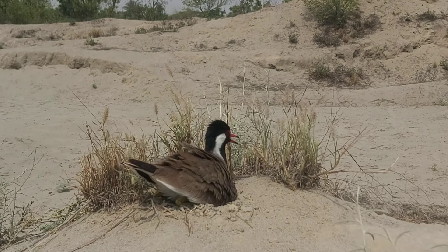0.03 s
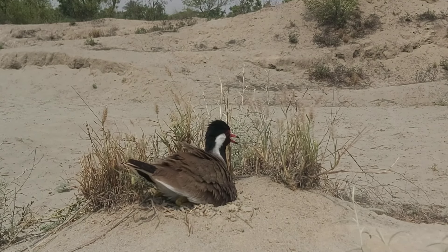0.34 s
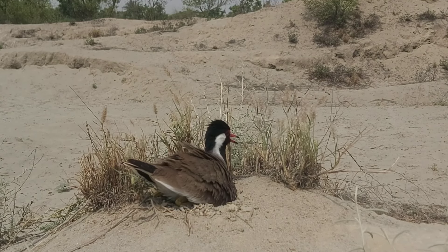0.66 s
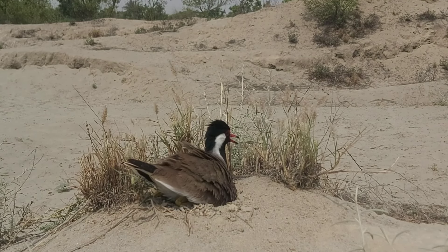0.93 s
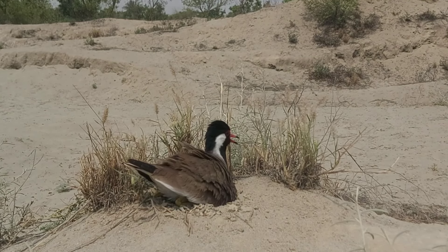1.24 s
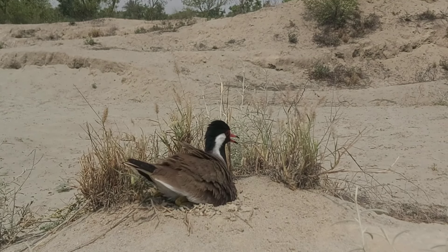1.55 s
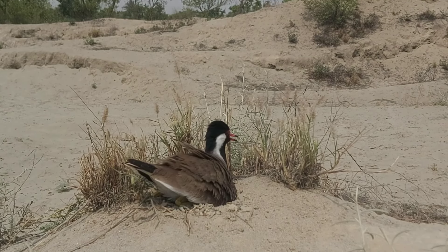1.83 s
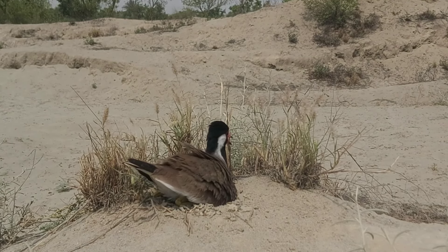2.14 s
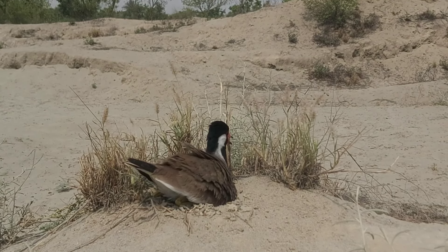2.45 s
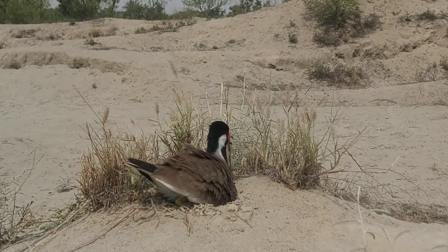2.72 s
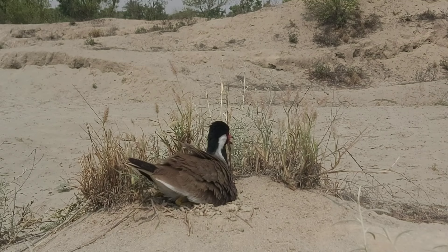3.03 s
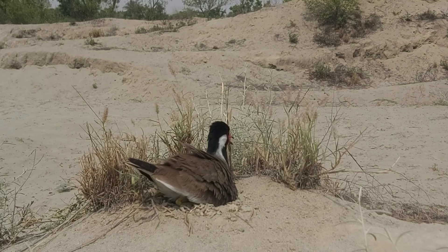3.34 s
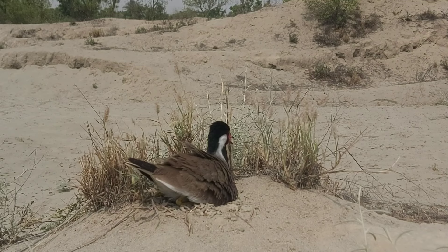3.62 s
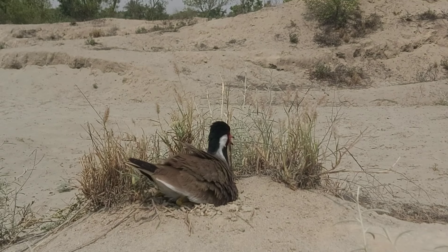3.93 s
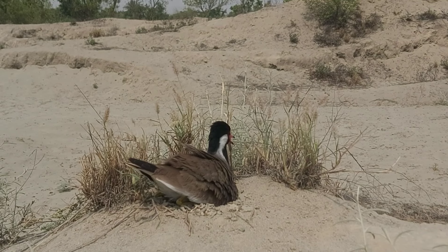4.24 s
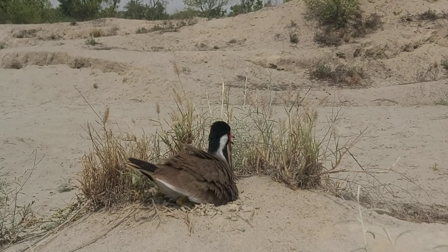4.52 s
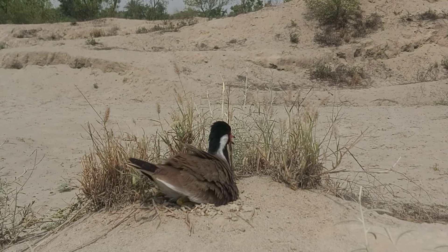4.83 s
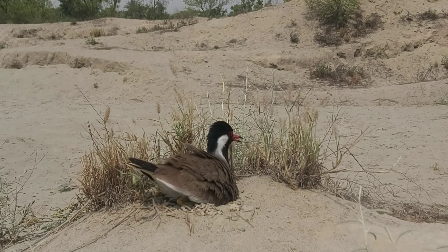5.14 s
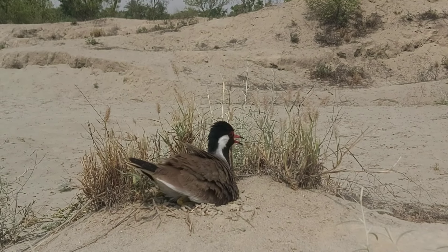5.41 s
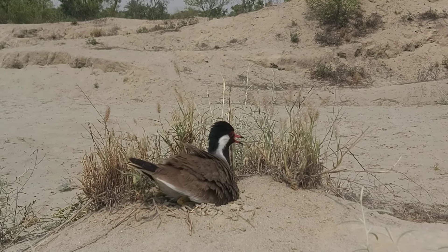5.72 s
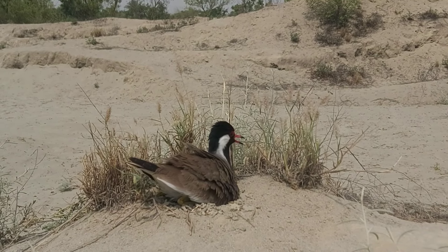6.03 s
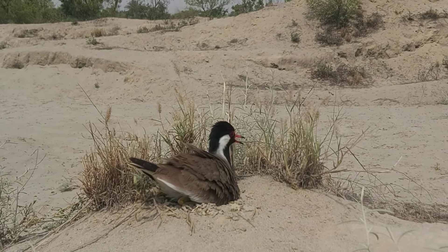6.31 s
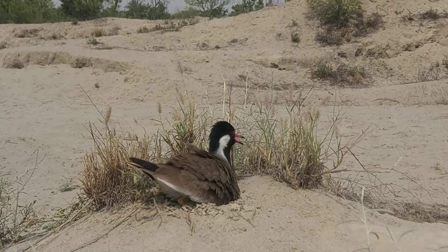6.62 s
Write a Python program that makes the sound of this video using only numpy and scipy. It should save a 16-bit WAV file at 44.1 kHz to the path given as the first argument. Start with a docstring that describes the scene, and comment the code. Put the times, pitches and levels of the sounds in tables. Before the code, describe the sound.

Outdoors on open sandy ground, low wind buffeting comes and goes on the microphone and is the loudest sound. Beneath it a distant engine chugs with a light knocking rattle, growing weaker after about three seconds. Short, reedy bird calls come from the left near the beginning and again at the end, with faint far-off chirps and a slight hiss of dry grass.

```python
"""Gusts of wind buffet a stereo microphone in open sandy scrub, their turbulent pressure a low rumble.
Far to the right a slow single-cylinder engine thuds from its exhaust and clatters from its casing,
swelling and fading on the wind. On the left a hoarse game bird calls in phrases of up to three notes,
a reedy harmonic voice. Small birds whistle and chirp further off, and dry grass stirs in the breeze."""
import sys
import numpy as np
from scipy import signal
from scipy.fft import rfft, irfft, next_fast_len
from scipy.io import wavfile
from scipy.ndimage import uniform_filter1d

SR = 44100
rng = np.random.default_rng(int(sys.argv[2]) if len(sys.argv) > 2 else 0)


def generate_wav(signal):
    """Clip the signal to [-1, 1] and save it as 16-bit WAV at the path in sys.argv[1]."""
    frames = np.transpose(np.atleast_2d(signal))
    scaled = np.clip(frames, -1, 1) * 32767
    pcm = np.round(scaled).astype(np.int16)
    wavfile.write(sys.argv[1], SR, pcm)


N = 294147
TIME = np.arange(N) / SR
ENGINE_LAG, BIRD_LAG = 19, -21  # samples by which the left ear lags

# Levels in the tables are relative; a positive pan is to the left.
# Spectra of the background: (frequency [Hz], level [dB])
AIR_SPECTRUM = [(100, 13.5), (400, -7.5), (700, -2.5), (1200, -2.5), (2300, -2.5), (3200, -9.5),
                (4300, -13), (5500, -19.5), (8000, -24.5), (16000, -51.5)]
GRASS_SPECTRUM = [(2000, -23), (3800, 12), (5500, 5), (7600, 11), (8300, 2), (12000, -15), (16000, -34.5)]
HISS_SPECTRUM = [(1000, -36), (6000, -35), (8500, -6.5), (10000, -2), (12300, 4), (15500, -2.5)]
# Falling slurs of small birds: (time [s], level [dB], starting pitch [Hz])
BIRD_SLURS = [(.628, -70.5, 3620), (.745, -60, 2584), (0.813, -71, 3670), (3.665, -74.5, 3700),
              (3.87, -80, 3700), (4.35, -68.5, 2270), (5.605, -74.5, 3570), (5.79, -67.5, 3810)]
# Their whistles: (time [s], duration [s], level [dB], pitch [Hz], final fall [share of pitch])
BIRD_WHISTLES = [(0.83, 0.16, -61.5, 2050, 0.085), (1.53, .1, -66, 2520, -0.034),
                 (1.787, 0.082, -67, 2420, .02), (1.987, 0.074, -66.5, 2450, 0),
                 (2.215, 0.1, -80, 5480, 0.057), (2.426, .1, -70.5, 4990, .13),
                 (4.256, .09, -77, 2300, 0.037), (6.456, 0.091, -65.5, 2288, 0.013)]
# Their buzzy chirps: (time [s], level [dB], pitch [Hz])
BIRD_BUZZES = [(-.015, -66.5, 3980), (.025, -74, 5700), (.165, -73, 5640), (.31, -72, 5500),
               (0.439, -79, 4050), (.675, -80, 4530), (1.24, -78, 5800), (1.631, -81, 6000),
               (1.42, -80.5, 3980), (1.735, -76, 3900), (2.275, -76, 5180), (3.527, -82, 4250),
               (3.689, -80, 4350), (3.85, -80, 4330), (4.944, -83.5, 4060), (5.987, -70, 2850)]
# Game bird notes: (time [s], duration [s], level [dB], pitch [Hz], rise [share of pitch], roughness [0-1])
GAME_NOTES = [(0.111, 0.064, -53.5, 489, -0.064, 0.2), (.2, 0.13, -53.5, 687, -0.013, 0.32),
              (0.323, 0.1, -52, 558.5, 0.027, 0.13), (0.998, 0.074, -63.5, 498, 0.022, 0),
              (1.229, 0.11, -57.5, 565, 0.03, 0), (6.081, 0.085, -58, 487, 0.116, 0.2),
              (6.185, 0.084, -56.5, 707, 0.041, .45), (6.303, .11, -51, 554.7, .06, 0.09)]
# Partials of its voice: (harmonic [number], level [dB])
GAME_HARMONICS = [(2, -26), (3, 0), (4, -16), (5, -21)]
# Engine timing, about 11 firings a second: (time [s], firings so far [count])
FIRING_COUNT = [(-.081, -1), (3.192, 36), (6.675, 75)]
# How well the breeze carries the engine: (time [s], exhaust level [dB], clatter level [dB])
TRANSMISSION = [(0, -56.5, -66), (.27, -56.5, -65), (.54, -65.5, -74.5), (.8, -58, -67), (1.07, -62, -74),
                (1.33, -63, -67), (2.05, -61, -68.5), (2.66, -67, -67), (3.35, -71.5, -75),
                (3.73, -73.5, -69), (4.2, -76.5, -73), (4.7, -81, -68.5), (5.1, -68.5, -69.5),
                (5.5, -77.5, -74.5), (6.15, -72, -71), (6.67, -75.5, -72.5)]
# Spectra of the engine's parts: (frequency [Hz], level [dB])
EXHAUST_SPECTRUM = [(30, 2), (70, -5.5), (130, -0.5), (200, -9), (300, -2.5), (400, -5), (480, -6.5),
                    (580, -30.5), (800, -29), (1500, -84)]
BOOM_SPECTRUM = [(15, -30.5), (30, -12), (60, 0.5), (100, 1), (150, -6), (210, -15), (295, -12),
                 (400, -31.5), (520, -39), (700, -62), (1500, -93)]
CLATTER_SPECTRUM = [(400, -38.5), (700, -18), (1050, 3.5), (1550, 0), (1950, -9), (2450, -18),
                    (3000, -16.5), (4000, -22), (6000, -48.5), (10000, -69.5)]
CASING_SPECTRUM = [(1500, -24), (2100, -10.5), (2300, -3), (2480, -3), (2750, -7.5), (3100, -18.5),
                   (4500, -57.5)]
# Reflections from banks of sand: (delay [s], level [dB])
BANK_ECHOES = [(0.017, -22), (0.027, -9.5), (0.051, -11.5)]
# Hardest engine knocks: (time [s], peak level [dB], ring frequency [Hz])
HARD_KNOCKS = [(0.627, -52, 2310), (0.716, -51, 2620), (0.8912, -43.5, 2110), (0.9817, -46, 2030),
               (1.0686, -51, 2450), (1.247, -44, 1750), (1.6884, -53, 1600), (1.7782, -48, 2330),
               (2.1301, -53.5, 1846), (2.3088, -49, 1700), (2.4862, -50, 2320), (2.5736, -42.5, 1890),
               (3.017, -51.5, 2260), (3.105, -51, 1810), (3.371, -53, 1480), (3.5498, -52.5, 1560),
               (3.7284, -48.5, 1730), (5.1572, -50, 1480)]
# Gusts at the microphone: (time [s], hold [s], level [dB], pan [dB])
WIND_GUSTS = [(0.031, 0.084, -33.5, 19), (0.197, 0.14, -34.5, 8), (0.722, 0.13, -45, -3),
              (0.886, .12, -51, 15), (1.216, 0.18, -35.5, 11.5), (1.495, 0.17, -38.5, 11),
              (1.78, .11, -35.5, 0), (1.945, 0.17, -35, 1), (2.31, 0.084, -41.5, 12),
              (2.456, 0.036, -34, 6), (2.513, 0.093, -28.5, 0.5), (3.201, 0.012, -44.5, 19),
              (3.368, 0.032, -43.5, 6), (3.55, 0.058, -41, 3), (3.77, 0.084, -45, 6.5),
              (4.328, 0.074, -42.5, 0), (4.44, 0.028, -38.5, 2), (4.58, 0.056, -40, -5),
              (5.028, 0.057, -30.5, 8), (5.115, 0.074, -33, 4), (5.225, 0.243, -43.5, 1),
              (5.591, 0.13, -37.5, -2.5), (5.808, 0.07, -43.5, -1), (5.98, 0.065, -37, 1),
              (6.128, 0.051, -32.5, 5), (6.306, 0.18, -41.5, 21)]
# Strongest eddies: (time [s], peak level [dB], frequency [Hz], pan [dB])
STRONG_EDDIES = [(0.068, -25, 107, 22), (0.753, -37, 80, -1), (0.98, -36, 170, 1), (1.255, -26, 89.2, 9),
                 (1.33, -24.5, 116, -7), (1.56, -26, 112, 12), (1.633, -26, 104, -1),
                 (1.885, -28.5, 109, -16), (1.958, -25, 108, -0.5), (2.006, -15, 117, 2),
                 (2.104, -22.5, 77, 3), (2.525, -22.5, 103, -5), (3.59, -22.5, 97, -2), (4.344, -29, 89, 0),
                 (4.369, -28, 77, -1), (2.601, -26, 101, 2), (5.038, -25.5, 270, 3),
                 (5.073, -22.5, 108, -10), (5.687, -24, 99, 1), (5.878, -36, 181, 0), (6.124, -23, 125, 2),
                 (6.364, -29, 87.5, 15)]
# Spectra of coarse and fine turbulence: (frequency [Hz], level [dB])
BUFFET_SPECTRUM = [(15, -30), (30, -20), (60, 3.5), (100, 1.5), (150, -5), (210, -13.5), (300, -19),
                   (400, -32.5), (520, -36.5), (700, -60.5), (1500, -92.5)]
SWIRL_SPECTRUM = [(80, -23.5), (200, 4.5), (290, -2.5), (380, -15), (520, -27), (750, -41), (1500, -79.5)]


def gain_of(db):
    """Amplitude ratio: a factor of ten for every 20 dB."""
    return 10 ** (np.asarray(db) / 20)


def unit_rms(x):
    """Normalisation to unit mean power."""
    return x / np.sqrt(np.mean(x ** 2) + 1e-20)


def curve(rows, column):
    """Linear interpolation of a table column at every sample."""
    rows = np.array(rows)
    return np.interp(TIME, rows[:, 0], rows[:, column])


def colour(x, spectrum):
    """Minimum-phase filtering to a given spectral shape, at unit rms."""
    hz, db = np.transpose(spectrum)
    bin_hz = abs(np.fft.fftfreq(4096, 1 / SR))
    log_gain = np.log(gain_of(np.interp(np.log(bin_hz + 1), np.log(hz), db)))
    taps = np.fft.ifft(np.exp(np.conj(signal.hilbert(log_gain)))).real
    return unit_rms(signal.oaconvolve(np.atleast_2d(x), taps[None, :len(taps) // 2], axes=1)[:, :N])


def noise():
    """White noise, incoherent between the two microphone ports."""
    return rng.standard_normal((2, N))


def wander(hz, size=N):
    """Random modulation: noise low-passed at hz, at unit rms."""
    padded = next_fast_len(size + 4096)
    rolloff = 1 + (np.fft.rfftfreq(padded, 1 / SR) / hz) ** 4
    return unit_rms(irfft(rfft(rng.standard_normal(padded)) / rolloff, padded))[:size]


def add(mix, start, sound):
    """Superposition of a sound at a time in seconds, which may be negative."""
    at = round(start * SR)
    sound = sound[..., max(-at, 0):]
    part = mix[..., max(at, 0):][..., :sound.shape[-1]]
    part += sound[..., :part.shape[-1]]


def arrive(x, lag):
    """Path difference: a far sound reaches one port before the other."""
    return np.array([np.roll(x, lag), x])


def pan(pan_db):
    """Level difference between left and right at constant total power."""
    pair = gain_of(np.array([[pan_db], [-pan_db]]) / 2)
    return pair / np.sqrt(np.mean(pair ** 2))


def scatter(x, t60, wet_db):
    """Scattering by scrub and uneven ground adds a diffuse, exponentially decaying tail."""
    t = np.arange(SR // 2) / SR
    tail = rng.standard_normal((2, len(t))) * gain_of(-60 * t / t60)
    tail /= np.linalg.norm(tail[0])
    return x + gain_of(wet_db) * signal.oaconvolve(x, tail, axes=1)[:, :N]


def excess_db(strength):
    """Power level of the wind relative to its mean level."""
    db = 10 * np.log10(np.mean(strength ** 2, axis=0))
    return db - db.mean()


def background(strength, air_db=-69, grass_db=-89, hiss_db=-81):
    """Flow noise: distant air, dry grass stirred by breeze and gusts, and a hiss that swells with gusts."""
    carried_db, gust_db = curve(TRANSMISSION, column=1), excess_db(strength)
    stir_db = 0.49 * (carried_db - carried_db.mean()) + 0.27 * gust_db
    flutter = 0.44 * wander(hz=12)
    air = gain_of(air_db + 2.5 * wander(hz=8.4)) * colour(noise(), AIR_SPECTRUM)
    grass = gain_of(grass_db + stir_db + 3.1 * flutter) * colour(noise(), GRASS_SPECTRUM)
    hiss = gain_of(hiss_db + flutter + 0.14 * gust_db) * colour(noise(), HISS_SPECTRUM)
    return air + grass * pan(9) + hiss * pan(-2.4)


def syllable(length, pitches, waver, waver_hz):
    """Frequency modulation: phase and arched envelope of a wavering glide through three pitches."""
    progress = np.linspace(0, 1, max(round(length * SR), 64))
    glide_hz = np.polyval(np.polyfit([0, .5, 1], pitches, 2), progress)
    hz = glide_hz * (1 + waver * wander(waver_hz, len(progress)))
    return 2 * np.pi * np.cumsum(hz) / SR, np.sin(np.pi * progress).clip(0)


def chirp(length, hz, contour, rough):
    """Amplitude modulation: a small bird's gliding tone flickers in the moving air."""
    phase, arch = syllable(length, hz * np.array(contour), waver=0.097 * rough, waver_hz=350)
    flicker = gain_of(3 * wander(150, len(phase)))
    return unit_rms(np.sin(phase) * arch ** 0.5 * flicker)


def small_birds(level_db=-5, pan_db=5):
    """Modulated tones, blurred by scattering in the scrub: slurs, whistles and buzzy chirps."""
    song = np.zeros(N)
    for start, db, hz in BIRD_SLURS:
        add(song, start, gain_of(db) * chirp(0.082, hz, contour=(1, 0.89, 0.74), rough=0.092))
    for start, length, db, hz, fall in BIRD_WHISTLES:
        add(song, start, gain_of(db) * chirp(length, hz, contour=(1, 1, 1 - fall), rough=0.12))
    for start, db, hz in BIRD_BUZZES:
        add(song, start, gain_of(db) * chirp(0.055, hz, contour=(0.973, 1, 1.027), rough=0.7))
    return scatter(gain_of(level_db) * pan(pan_db) * song, t60=0.24, wet_db=-1)


def game_bird(rasp=0.058, rasp_hz=260, flutter=0.0185, throat_hz=2800, flicker_db=2):
    """Source and filter: a reedy voice, strongest in its third harmonic, rasps under fast modulation."""
    calls = np.zeros(N)
    for start, length, db, hz, rise, rough in GAME_NOTES:
        pitches = (hz * (1 - rise / 2), hz, hz * (1 + rise / 2))
        phase, arch = syllable(length, pitches, rasp * rough, rasp_hz)
        phase += 2 * np.pi * np.cumsum(hz * flutter * wander(49, len(phase))) / SR
        voice = sum(gain_of(level) * np.sin(k * phase) for k, level in GAME_HARMONICS)
        voice *= 1 + 1.05 * rough * wander(rasp_hz, len(phase))
        flicker = gain_of(flicker_db * wander(45, len(phase)))
        add(calls, start, gain_of(db) * unit_rms(voice * arch ** 0.66 * flicker))
    throat = signal.butter(6, throat_hz, fs=SR, output="sos")  # little passes above its resonance
    return scatter(arrive(signal.sosfilt(throat, calls), BIRD_LAG), t60=0.22, wet_db=-13.5)


def since_firing():
    """Cycle phase divided by firing rate gives the seconds since the cylinder last fired."""
    cycles = curve(FIRING_COUNT, column=1)
    return cycles % 1 / (np.gradient(cycles) * SR)


def exhaust(level_db=5, puff=0.016, puff_decay_s=0.061, uneven_db=2.2):
    """Pulse excitation: each firing emits a pressure pulse, which the banks reflect, and a puff of gas."""
    age = since_firing()
    fires = np.diff(age, prepend=0) < -age.mean()
    pulses = fires * gain_of(uneven_db * wander(hz=22))
    thud = pulses + puff * np.exp(-age / puff_decay_s) * rng.standard_normal(N)
    for delay, db in BANK_ECHOES:
        add(thud, delay, gain_of(db) * pulses)
    direct = arrive(colour(thud, EXHAUST_SPECTRUM)[0], ENGINE_LAG)
    heard = scatter(direct, t60=0.25, wet_db=-9.5)
    return unit_rms(heard) * gain_of(curve(TRANSMISSION, column=1) + level_db)


def throb(level_db=14, decay_s=0.015, peak_s=0.0087, uneven_db=3):
    """Diffraction: the bass of each firing bends round the banks and arrives as a soft boom."""
    swell = np.exp(-abs(since_firing() - peak_s) / decay_s)
    swell *= gain_of(uneven_db * np.tanh(wander(hz=5)))
    boom = colour(swell * rng.standard_normal(N), BOOM_SPECTRUM)[0]
    carried_db = 0.4 * curve(TRANSMISSION, column=1) + 0.6 * curve(TRANSMISSION, column=2)
    return arrive(boom, ENGINE_LAG) * gain_of(carried_db + level_db)


def clatter(level_db=3, ring_db=-9, decay_s=0.011, uneven_db=2.2, steady_rattle=0.25):
    """Impact noise: combustion knock, then valve slap; the casing rings through when the exhaust is loud."""
    age = since_firing()
    knock, slap = ((age > at) * np.exp(-abs(age - at) / decay_s) for at in (0.0028, 0.016))
    blows = (knock + 0.23 * slap) * gain_of(uneven_db * np.tanh(wander(hz=17)))
    rattle = (blows + steady_rattle) * noise()
    body = colour(rattle[0], CLATTER_SPECTRUM)[0] * gain_of(curve(TRANSMISSION, column=2) + level_db)
    ring = colour(rattle[1], CASING_SPECTRUM)[0] * gain_of(curve(TRANSMISSION, column=1) + ring_db)
    return scatter(arrive(body + ring, ENGINE_LAG), t60=0.4, wet_db=-11)


def knocks(level_db=-2, decay_s=0.0012, ring_decay_s=0.00066):
    """Damped resonance: the sharp rap of a hard firing briefly rings one part of the casing."""
    raps, t = np.zeros(N), np.arange(SR // 20) / SR
    for start, db, hz in HARD_KNOCKS:
        ring = t * np.exp(-t / ring_decay_s) * np.sin(2 * np.pi * hz * t)
        blow = np.exp(-t / decay_s) * rng.standard_normal(len(t))
        rap = np.convolve(blow, np.gradient(ring))[:len(t)]
        add(raps, start, gain_of(db + level_db) * rap / abs(rap).max())
    return scatter(arrive(raps, ENGINE_LAG), t60=0.15, wet_db=-4)


def wind_strength(breeze_db=-50, swing_db=5.5, attack_s=0.016, release_s=0.03):
    """Powers add at each port: an unsteady breeze, and gusts that rise, hold and die away."""
    breeze = gain_of(breeze_db + swing_db * np.tanh(wander(hz=9.4))) * pan(2)
    power = breeze ** 2
    for start, hold, db, pan_db in WIND_GUSTS:
        before = np.maximum(start - TIME, 0) / attack_s
        after = np.maximum(TIME - start - hold, 0) / release_s
        envelope = np.exp(-np.minimum(before + after, 20))
        power += (gain_of(db) * pan(pan_db) * envelope) ** 2
    return np.sqrt(power)


def eddies(level_db=-2, max_skew_turns=0.55):
    """Convection: a passing eddy swings the pressure for a few cycles, out of phase at the two ports."""
    pressure, age = np.zeros((2, N)), np.arange(-SR // 20, SR // 20) / SR
    median_hz = np.median([row[2] for row in STRONG_EDDIES])
    for centre, db, hz, pan_db in STRONG_EDDIES:
        turn, lead = rng.random(2)
        skew = max_skew_turns * lead ** 2 * np.array([[0], [1]])
        width_cycles = 0.48 * (hz / median_hz) ** 0.59  # small, high eddies last more cycles
        envelope = np.exp(-0.5 * (age * hz / width_cycles) ** 2)
        swing = envelope * np.cos(2 * np.pi * (hz * age + turn + skew))
        add(pressure, centre + age[0], gain_of(db + level_db) * pan(pan_db) * swing)
    return pressure


def wind(strength, level_db=-3, lump_hz=22, lump_db=5, swirl_db=-17, swirl_growth=0.38):
    """Turbulence: lumpy pressure, different at each port; hard gusts break into finer, higher swirls."""
    buffet = colour(noise(), BUFFET_SPECTRUM)
    buffet /= np.sqrt(uniform_filter1d(buffet ** 2, size=2600, axis=1))  # steady the short-term power
    swirls = colour(noise(), SWIRL_SPECTRUM) * gain_of(swirl_db + swirl_growth * excess_db(strength))
    lumps = unit_rms(gain_of(lump_db * np.tanh([wander(lump_hz), wander(lump_hz)])))
    return (buffet + swirls) * lumps * strength * gain_of(level_db)


def scene():
    """Superposition of wind, engine, birds and background."""
    strength = wind_strength()
    engine = exhaust() + throb() + clatter() + knocks()
    return wind(strength) + eddies() + engine + game_bird() + small_birds() + background(strength)


def record(dry, cutoff_hz=15820):
    """Band limiting: a steep linear-phase low-pass removes the highest treble."""
    taps = signal.firwin(511, cutoff_hz, window=("kaiser", 9), fs=SR)
    return signal.oaconvolve(dry, taps[None], "same")


dry = scene()
out = record(dry)
generate_wav(out)
```